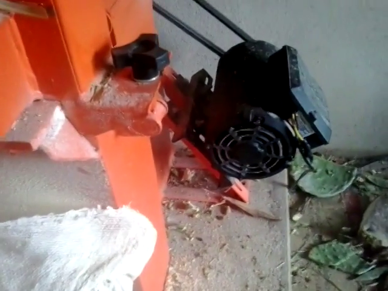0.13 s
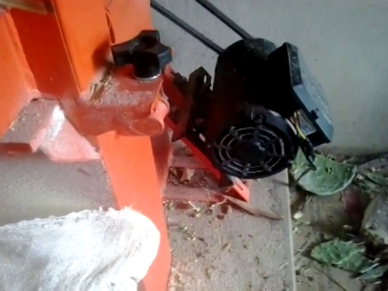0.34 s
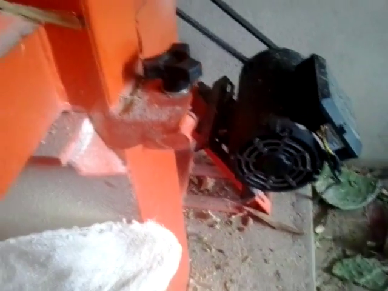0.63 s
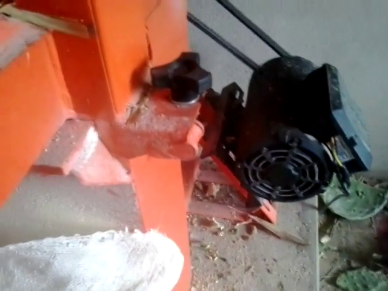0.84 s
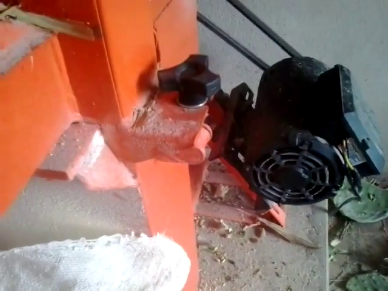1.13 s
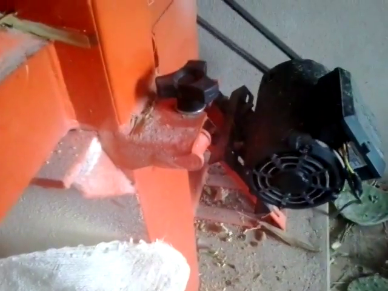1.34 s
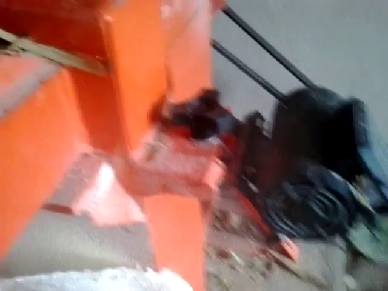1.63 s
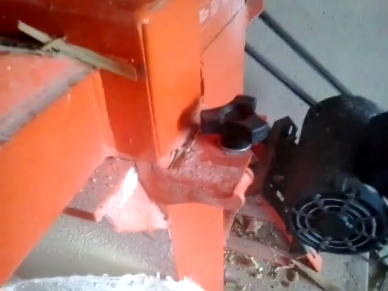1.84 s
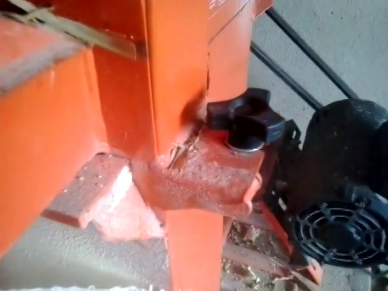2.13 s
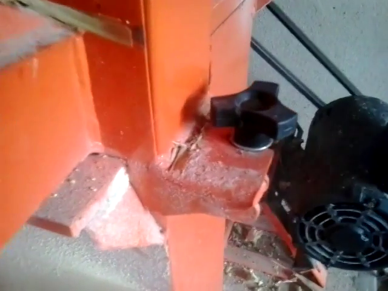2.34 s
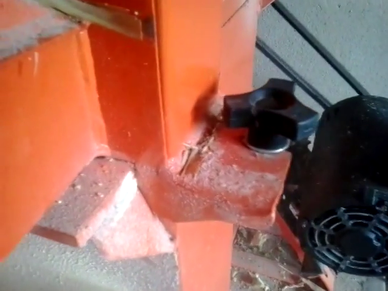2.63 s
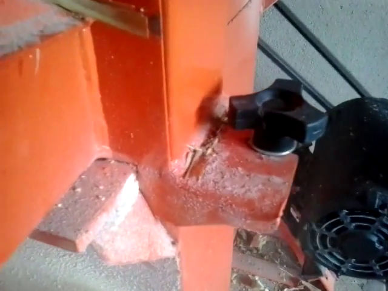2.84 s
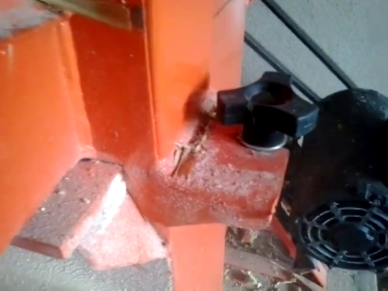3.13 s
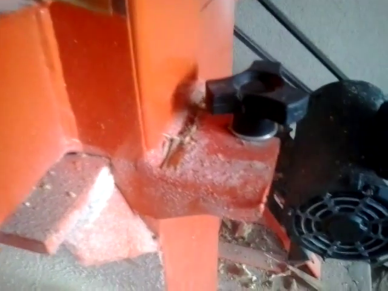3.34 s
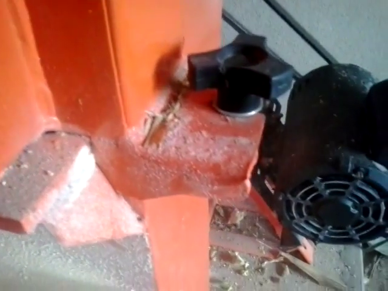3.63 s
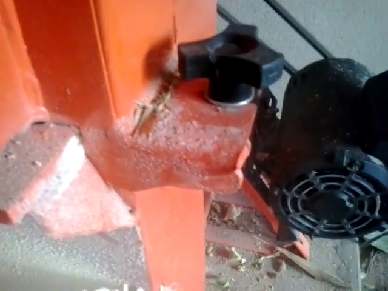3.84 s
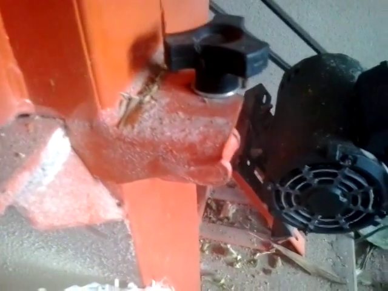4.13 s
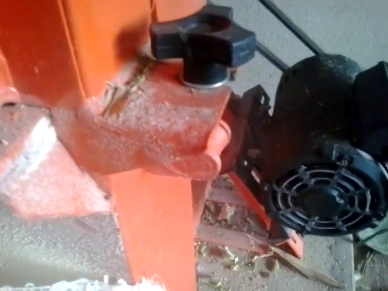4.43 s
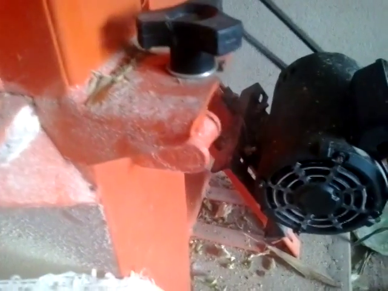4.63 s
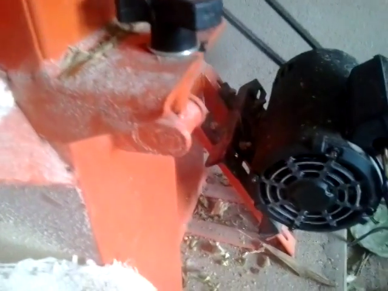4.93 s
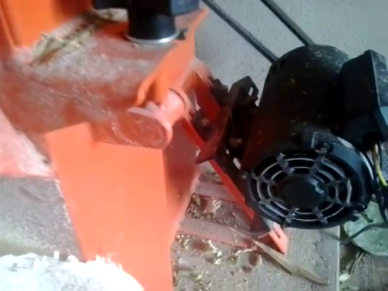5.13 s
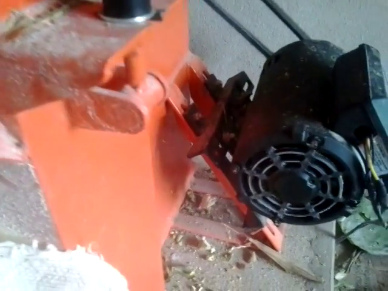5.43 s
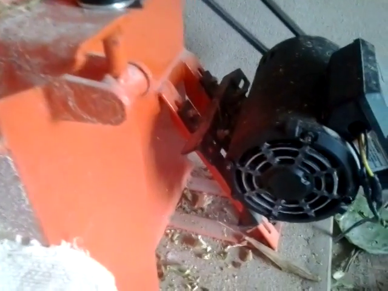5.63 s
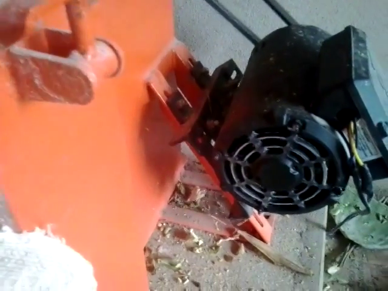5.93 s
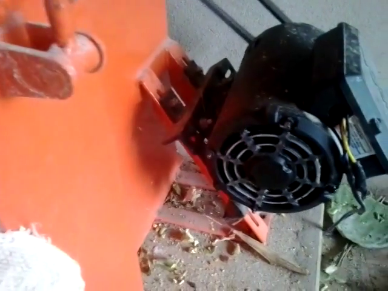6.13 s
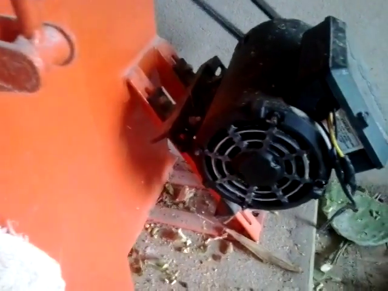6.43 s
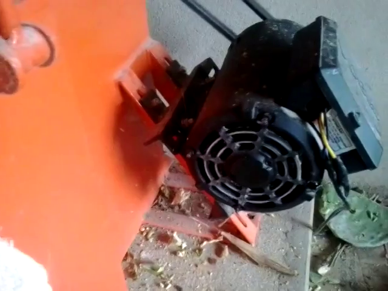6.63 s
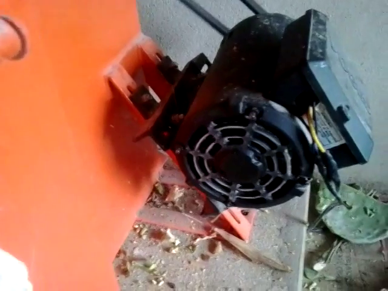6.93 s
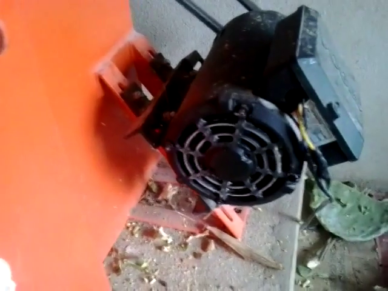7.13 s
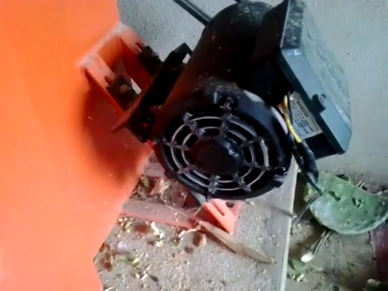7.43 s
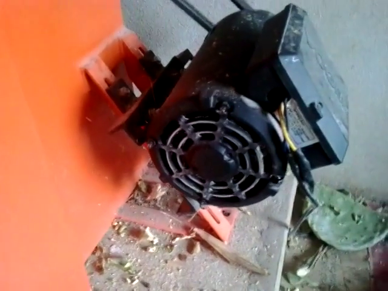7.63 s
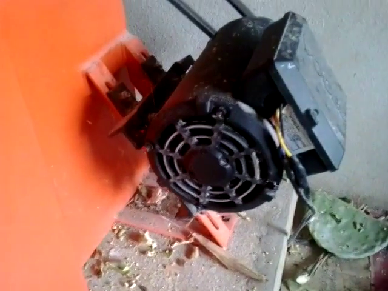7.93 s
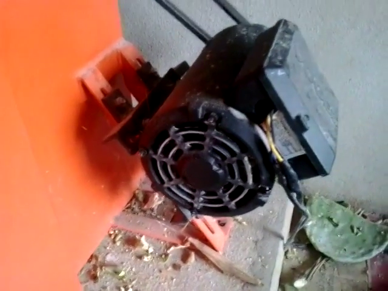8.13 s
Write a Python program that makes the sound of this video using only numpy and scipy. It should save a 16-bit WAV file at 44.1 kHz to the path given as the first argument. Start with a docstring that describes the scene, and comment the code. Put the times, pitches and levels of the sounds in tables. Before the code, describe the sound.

From 0 to about 8.3 seconds an electric forage chopper runs at constant speed in a farm shed, very close, with no start-up or stop. A loud, wide hiss of air and grain, strongest around 5 to 9 kilohertz and grainy in texture, fills everything. Under it a mid-low hum near 310 hertz throbs about 2.7 times a second, with a cluster of weaker buzzing rotor and belt tones. A thin panel whine near 1.7 kilohertz wavers, clearer around 2.6 and 4.4-5.1, dipping at 5.7, then returning. Short dry chaff rustles fall at 1.8, 2.8 (strongest) and 4.7. Soft, low air bumps nudge the microphone irregularly throughout. As it drifts from casing to motor, the rush grows fuller and slightly duller towards 5.75, then eases and brightens again; the hum weakens, lowest near 7.1, and partly recovers. The sound is flattened by overload, harsh, and thin in deep bass.

```python
"""In a farm shed, an electric forage chopper runs steadily, close to a small hand-held microphone.
Motor, belt and knife rotor shake the steel frame: a throbbing hum, summed from beating sines, and weaker tones.
Air and grain rush through the casing as shaped noise, and its panels sing as narrow bands of noise.
Chaff spatters the casing and fan air buffets the capsule while the microphone drifts from casing to motor.
The microphone overloads: the wave is flattened, then equalised and stripped of its deepest bass."""
import sys
import numpy as np
from scipy import signal
from scipy.fft import rfft, irfft, next_fast_len
from scipy.io import wavfile
from scipy.ndimage import uniform_filter1d, map_coordinates

SR = 44100
rng = np.random.default_rng(int(sys.argv[2]) if len(sys.argv) > 2 else 0)


def elevation(decibels):
    """Turn decibel levels (scalar or array-like) into linear amplitude ratios."""
    levels = np.asarray(decibels, float)
    return 10 ** (levels / 20)


def waveform_to_disk(signal):
    """Save audio, clipped to [-1, 1], as 16-bit WAV at the path in sys.argv[1]."""
    frames = np.transpose(np.atleast_2d(signal))
    scaled = np.clip(frames, -1, 1) * 32767
    samples = np.round(scaled).astype(np.int16)
    wavfile.write(sys.argv[1], SR, samples)


N = 365588

# All source levels are those ahead of the microphone's own gain and overload.
# The first and last of the evenly spaced stands that the drifting microphone passes [s].
STAND_TIMES = (1, 7.3)
# Repeat rates of three turning parts, taken to be knife rotor, pulley and belt [Hz].
KNIFE_HZ, PULLEY_HZ, BELT_HZ = 156.29, 43.711, 2.706
HUM_HZ = 2 * KNIFE_HZ

# Air from the motor fan on the capsule: mean level, swing of the lumps, and their pace.
BUFFET_DB, LUMP_SWING_DB, LUMPS_PER_S = -43, 7, 16
# The strongest pushes of that air. Each row: centre in seconds, envelope peak in dB.
PUSHES = [(.143, -23), (.325, -23), (.945, -18), (1.19, -23), (1.317, -24), (1.406, -22), (2.072, -22),
          (3.27, -24), (3.396, -22), (3.889, -18), (3.986, -23), (4.288, -18), (4.582, -21), (4.736, -18),
          (5.358, -19), (6.021, -24), (6.935, -18), (7.208, -24), (7.531, -21)]
PUSH_SPREAD_S, PUSH_HZ = .012, 85  # standard deviation of the envelope, pitch

# Handfuls of chaff thrown on the casing.
# Each row: start in seconds, level in dB before the rise and decay, centre in Hz.
CHAFF_THROWS = [(1.7634, -16, 5080), (2.8005, -10.5, 5600), (4.6673, -15, 5700)]

# Casing panels driven by the stream.
# Each row: centre in Hz, width at half amplitude in Hz, levels in dB at three stands.
CASING_PANELS = [(639, 66, -37, -40, -35.5), (1483, 40, -42, -39, -43), (1820, 590, -28.5, -29, -31),
                 (1835, 25, -42, -44, -38), (3490, 200, -38, -33, -33), (4136, 90, -40, -39, -39),
                 (4790, 220, -33, -31.5, -34), (5125, 140, -31.5, -30.5, -30.5),
                 (5600, 160, -26.5, -30.5, -32.5), (6116, 380, -23, -32, -30),
                 (7598, 300, -24, -24.5, -25.5), (7819, 240, -27, -25.5, -25),
                 (8368, 360, -27, -27.5, -22.5), (8800, 73, -37.5, -30.5, -38), (9350, 200, -33, -32, -45),
                 (10070, 53, -41, -35, -38), (10120, 440, -34, -33, -37.5), (10940, 1000, -32, -26.5, -33)]
# One panel sings louder and softer as the microphone drifts. Each row: time in seconds, level in dB.
WHINE_LEVELS = [(0, -34), (.9, -36), (2.6, -30), (3.5, -33), (4.4, -30), (5.1, -29.5), (5.7, -40), (7, -31),
                (8.29, -31)]

# Spectrum of the air and grain. Each row: frequency in Hz, relative density in dB per Hz.
RUSH_SPECTRUM = [(30, -28), (150, -16.5), (400, -12.5), (1200, -19.5), (2500, -20), (4300, -13.5),
                 (5500, -10), (7000, -7), (8500, -8.5), (9100, -10.5), (9800, -13), (12000, -15.5),
                 (17500, -23)]
# The rush along the drift. Each row: time in seconds, level in dB, brightness above 9 kHz in dB.
RUSH_COURSE = [(0.0, -14.5, 4), (0.51, -13.5, 1.5), (4.13, -12.5, 1.5), (4.3, -12, 1), (5.75, -11, -2),
               (8.29, -12.5, 1.5)]

# Sums and multiples of the three rates. Each row: times knife, times pulley, times belt,
# levels in dB at three stands, before the common lift.
FRAME_TONES = [(1, 0, 1, -37, -38, -39), (0, 4, 0, -41, -36.5, -38), (1, 2, 1, -48, -45, -44),
               (0, 6, 0, -45, -47, -42), (2, -1, 2, -45, -44, -45), (0, 8, 0, -40, -39, -48),
               (2, 1, 0, -43, -43, -48), (2, 1, 1, -38, -40, -42), (2, 1, 2, -40, -39, -41),
               (-1, 12, 0, -43, -44, -42), (1, 5, -1, -48, -43, -46), (1, 5, 0, -40, -41, -38),
               (2, 2, 0, -42, -45, -44), (1, 6, 0, -40, -45, -42), (3, -1, 0, -40, -45, -31),
               (3, -1, 2, -53, -43, -41), (0, 10, 0, -41, -47, -40), (1, 7, 0, -44, -48, -40),
               (3, 0, 0, -42, -40, -30.5), (3, 0, 1, -45, -44, -42), (3, 0, 3, -47, -45, -53),
               (1, 8, 1, -46, -44, -48), (3, 1, 0, -38.5, -34.5, -37.5), (3, 3, 0, -45, -48, -43),
               (0, 14, 0, -44, -48, -48), (2, 7, 0, -41, -39, -43), (4, 0, 0, -43, -48, -47),
               (4, 0, 1, -41, -45, -50), (3, 4, 0, -41, -50, -55)]
TONES_LIFT_DB = 1.5

# The main hum of the frame. Each row: time in seconds, level in dB.
HUM_LEVELS = [(0, -18.5), (.6, -20), (1.4, -19), (2.7, -18.5), (2.85, -20.5), (4.1, -21), (5.3, -22),
              (5.9, -25.5), (6.5, -23.5), (7.1, -28), (8.1, -22.5)]
# Close neighbours that beat with the hum. Each row: offset from the hum in Hz, moment in step with it
# in seconds, levels in dB at three stands, before the common lift.
HUM_NEIGHBOURS = [(2.71, .02, -30, -34, -32), (-2.72, .18, -41, -43, -41), (5.41, .158, -43, -40, -37),
                  (-6.61, .1, -41, -40, -37), (11.94, .02, -47, -41, -42)]
NEIGHBOURS_LIFT_DB = 3.5

# Resonance of the microphone port: centre in Hz, width in Hz, extra gain as a factor.
MIC_PORT = (8784, 2340, 1.83)
BASS_LEAK = .013  # small constant gain past the low cut, so that some deep bass remains


def unit(x):
    """Scaled to rms 1."""
    return x / np.sqrt(np.mean(x ** 2))


def curves(rows):
    """One value per sample for each column after the time."""
    s, *columns = np.transpose(rows)
    return [np.interp(np.arange(N) / SR, s, column) for column in columns]


def drifting(levels_db):
    """Gain per sample as the microphone passes the stands, from the level at each."""
    stands = np.linspace(*STAND_TIMES, len(levels_db))
    return elevation(np.interp(np.arange(N) / SR, stands, levels_db))


def wobble(rate):
    """A smooth random curve with rate knots a second."""
    s = np.arange(0, N + 16, 16) / SR
    knots = rng.standard_normal(int(N * rate / SR) + 4)
    return np.interp(np.arange(N) / SR, s, map_coordinates(knots, [s * rate]))


def filtered(x, response):
    """x with its spectrum multiplied by a response of frequency."""
    m = next_fast_len(N + 8192)
    hz = np.fft.rfftfreq(m, 1 / SR) + 1e-3  # clear of zero, for the divisions
    return irfft(rfft(x, m) * response(hz), m)[:N]


def band(hz, width):
    """Noise of rms 1 ringing in one resonance."""
    noise = rng.standard_normal(N)
    return unit(filtered(noise, lambda f: 1 / (1 + (2 * (f - hz) / width) ** 2)))


def smoothed_field(shape, bins, frames):
    """Random field of rms 1, averaged over frequency bins and time frames."""
    across = uniform_filter1d(rng.standard_normal(shape), size=bins, axis=0)
    return unit(uniform_filter1d(across, size=frames, axis=1))


def patchy(patchy_db, modes_db):
    """White noise with brief wide patches and the long thin streaks of many small casing modes."""
    z = signal.stft(rng.standard_normal(N), nperseg=1024)[2]
    patches = smoothed_field(z.shape, bins=12, frames=7)
    streaks = smoothed_field(z.shape, bins=2, frames=90)
    gain = elevation(patchy_db * patches + modes_db * streaks)
    return signal.istft(z * gain, nperseg=1024)[1][:N]


def buffet():
    """Low lumps of fan air push on the capsule, a few of them strong."""
    t = np.arange(N) / SR
    lumps = unit(elevation(LUMP_SWING_DB * wobble(LUMPS_PER_S)) * band(120, 63))
    pushes = np.zeros(N)
    for s, db in PUSHES:
        envelope = elevation(db) * np.exp(-.5 * ((t - s) / PUSH_SPREAD_S) ** 2)
        pushes += envelope * np.sin(2 * np.pi * PUSH_HZ * (t - s))
    return elevation(BUFFET_DB) * lumps + pushes


def spatters():
    """Each throw of chaff is a short rustle around one pitch."""
    t = np.arange(N) / SR
    out = np.zeros(N)
    for s, db, hz in CHAFF_THROWS:
        rise = np.clip((t - s) / .012, 0, 1)
        decay = elevation(-60 * np.clip(t - s, 0, None) / 0.39)  # 60 dB in 0.39 s
        out += elevation(db) * rise * decay * band(hz, 2200)
    return out


def panels():
    """Each panel rings in its own band of noise, as if picked out of the turbulence."""
    whine_db = curves(WHINE_LEVELS)[0] + 2.2 * wobble(4.5) + 0.79 * wobble(18)
    out = elevation(whine_db) * band(1713.6, 31)
    for hz, width, *levels in CASING_PANELS:
        out += drifting(levels) * elevation(1.84 * wobble(2.504)) * band(hz, width)
    return out


def rush():
    """Broad turbulence of air and grain; its treble follows the microphone's aim."""
    flow_db, bright_db = curves(RUSH_COURSE)
    hz_points, density_db = np.transpose(RUSH_SPECTRUM)
    spectrum = lambda hz: elevation(np.interp(np.log(hz), np.log(hz_points), density_db))
    stream = unit(filtered(patchy(patchy_db=1.08, modes_db=1.8), spectrum))
    treble = filtered(stream, lambda hz: 1 / (1 + (9000 / hz) ** 8))
    # the stream swells once a belt lap
    lap_db = 0.3 * np.cos(2 * np.pi * BELT_HZ * (np.arange(N) / SR - .225))
    slow_db = 0.77 * wobble(3.095) + 0.37 * wobble(9)
    grain_db = 2.14 * wobble(450)  # the patter of single grains
    surge = elevation(flow_db + lap_db + slow_db + grain_db)
    return surge * (stream + (elevation(bright_db) - 1) * treble)


def tones():
    """Steady weaker tones of the turning parts, each wavering a little in level."""
    t = np.arange(N) / SR
    out = np.zeros(N)
    for knife, pulley, belt, *levels in FRAME_TONES:
        hz = knife * KNIFE_HZ + pulley * PULLEY_HZ + belt * BELT_HZ
        sine = np.sqrt(2) * np.sin(2 * np.pi * (hz * t + rng.random()))
        out += drifting(levels) * elevation(1.5 * wobble(1.96)) * sine
    return elevation(TONES_LIFT_DB) * out


def hum():
    """The frame's main hum throbs where its neighbours fall in and out of step with it."""
    t = np.arange(N) / SR
    swing = elevation(curves(HUM_LEVELS)[0] + 0.26 * wobble(12.0)) + 0j
    for offset, s, *levels in HUM_NEIGHBOURS:
        turning = np.exp(2j * np.pi * offset * (t - s))
        swing += elevation(NEIGHBOURS_LIFT_DB) * drifting(levels) * turning
    return np.sqrt(2) * np.real(swing * np.exp(2j * np.pi * HUM_HZ * t))


def scene():
    """Buffeting and spatters behind, then panels and stream, and the frame's tones in front."""
    return (buffet() + spatters() + panels() + rush() + tones() + hum())[None]


def roll_off(x):
    """The treble ends steeply here."""
    return signal.sosfilt(signal.butter(12, 17560, fs=SR, output="sos"), x)


def record(dry):
    """The port lifts the treble into overload; an equaliser, a low cut and a band limit follow."""
    centre, width, gain = MIC_PORT
    port = lambda hz: 1 + gain * 1j * hz * width / (centre ** 2 - hz ** 2 + 1j * hz * width)
    loud = elevation(7.5) * filtered(dry[0], port)
    flattened = loud / (1 + np.abs(loud / 0.55) ** 5.67) ** (1 / 5.37)
    steep_cut = lambda hz: (1j * hz / (1j * hz + 160)) ** 3
    second_cut = lambda hz: hz ** 2 / (hz ** 2 - 125 ** 2 - 1.3j * 125 * hz)
    low_cut = lambda hz: steep_cut(hz) * second_cut(hz) + BASS_LEAK
    band_limit = lambda hz: np.where(hz < 17210, 1, elevation(-60)) / (1 + (hz / 18500) ** 16)
    # dividing by the port's response is the equaliser that undoes its lift
    mix = elevation(3.0) * filtered(flattened, lambda hz: low_cut(hz) * band_limit(hz) / port(hz))
    return roll_off(mix[None])


dry = scene()
out = record(dry)
waveform_to_disk(out)
```